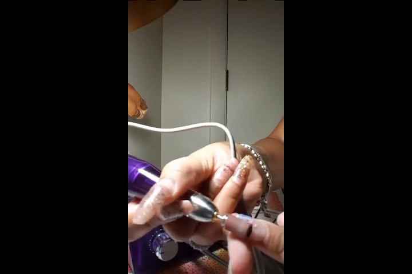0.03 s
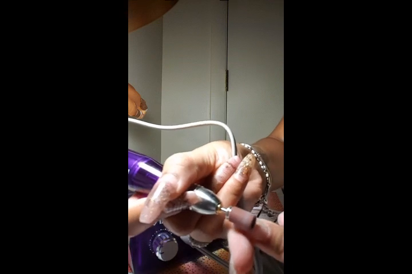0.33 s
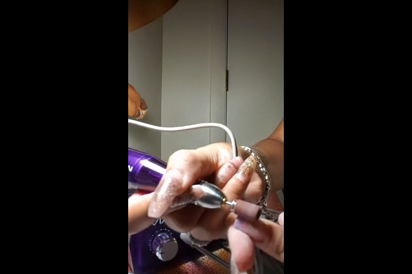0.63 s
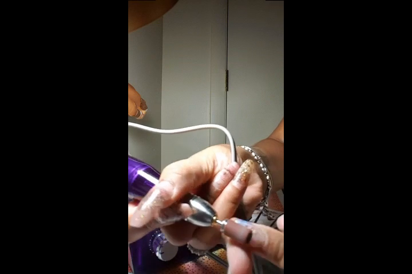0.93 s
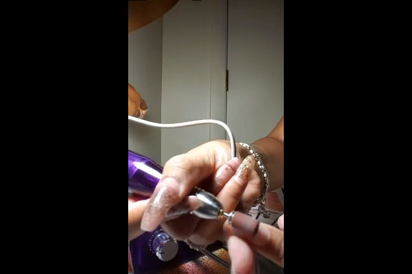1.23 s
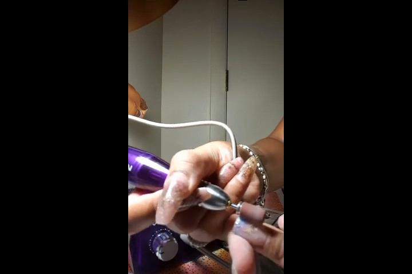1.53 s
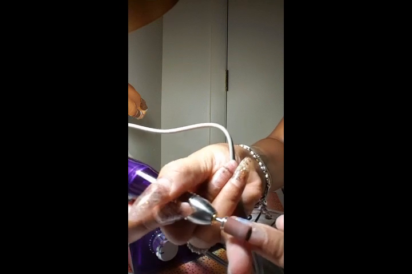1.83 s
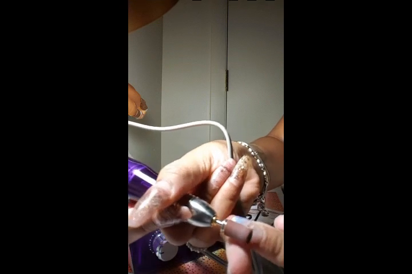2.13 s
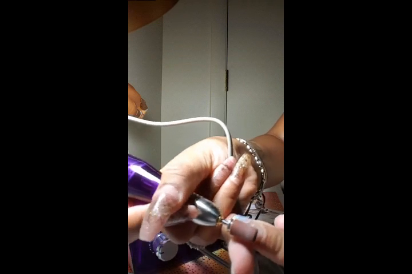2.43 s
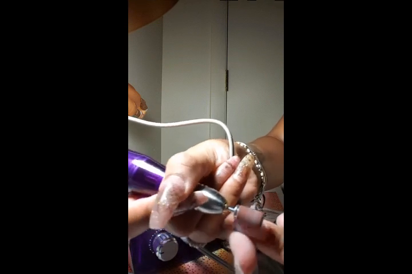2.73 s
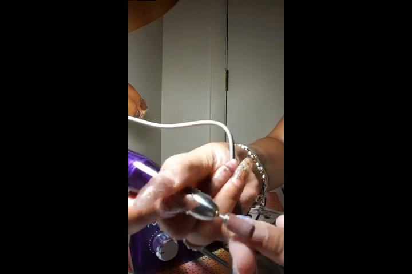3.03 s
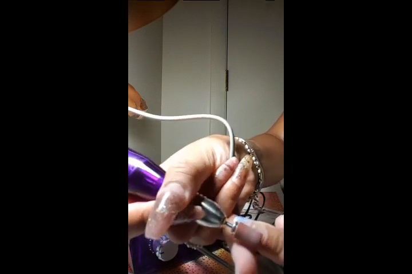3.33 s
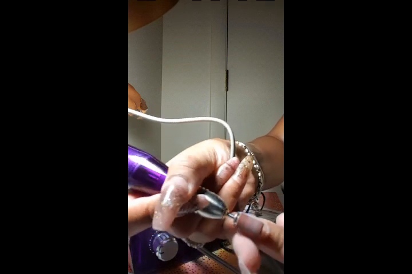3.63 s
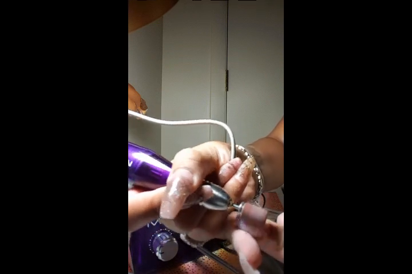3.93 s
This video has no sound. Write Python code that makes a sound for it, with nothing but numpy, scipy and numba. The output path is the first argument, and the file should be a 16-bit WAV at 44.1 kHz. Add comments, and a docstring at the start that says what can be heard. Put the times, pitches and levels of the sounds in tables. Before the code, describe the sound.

Four gritty strokes of an electric nail drill on a nail, its motor whining between them.

```python
"""An electric nail file whines close by in a small room, at about 100 turns a second, over a low hum.
Its motor brushes tick and its bearing rustles. At 0.2 s the bit meets a fingernail, and the same grit
strikes the nail on every turn: a light touch rattles on the bit's high spot, a firm one rasps all round
and slows the motor. The bit lifts and the motor whines freely again. More strokes follow at 1.1 s and
2.5 s, and a fourth from 3.4 s drags the motor lowest and is still grinding at the end."""
import sys
import numpy as np
from scipy import signal
from scipy.fft import rfft, irfft, next_fast_len
from scipy.io import wavfile
from scipy.ndimage import uniform_filter1d, map_coordinates
from numba import njit

SR = 44100
rng = np.random.default_rng(int(sys.argv[2]) if len(sys.argv) > 2 else 0)


def pcm_store(signal):
    """Save signal as 16-bit PCM."""
    levels = np.round(np.clip(np.atleast_2d(signal), -1, 1) * 32767)
    wavfile.write(sys.argv[1], SR, levels.astype(np.int16).T)


N = 176400
TIME = np.arange(N) / SR

# The shaft slowing under load. Each row: time in seconds, turns per second.
SHAFT_SPEED = [(0.0, 100.2), (0.2, 100.2), (0.39, 94.0), (0.61, 90.2), (0.66, 90.4), (0.72, 95.4),
               (0.76, 96.8), (0.82, 95.0), (0.85, 95.0), (0.92, 100.2), (1.11, 100.3), (1.32, 95.2),
               (1.5, 92.7), (1.55, 93.6), (1.6, 97.9), (1.67, 99.7), (1.77, 100.3), (2.51, 100.5),
               (2.6, 97.5), (2.68, 96.2), (2.78, 96.5), (2.93, 92.4), (2.99, 94.6), (3.06, 99.6),
               (3.1, 100.3), (3.33, 100.4), (3.45, 99.4), (3.56, 93.8), (3.69, 91.6), (3.79, 87.4),
               (3.87, 87.1), (4.0, 89.5)]
# The whine's partials. Each row: multiple of the shaft speed, relative level in dB.
WHINE_PARTIALS = [(9, -61.5), (10, -68.5), (11, -78.5), (12, -59), (13, -62.5), (14, -69), (15, -68),
                  (17, -63), (18, -66.5), (25, -98), (26, -72), (27, -64.5), (29, -74.5), (39, -71),
                  (43, -70), (57, -67), (113, -91), (117, -76), (128, -82)]
# Tone colours. Each row: frequency in Hz, relative level in dB.
BRUSH_EQ = [(300, -14), (600, -5.5), (1200, -21), (1800, -10), (2100, -8), (2700, 3.5), (3300, 0),
            (3700, -22), (4300, -1.5), (5100, -17), (5750, -3.5), (6400, -9), (7800, -14), (9200, -6),
            (10400, -12), (11600, -3), (12700, -1), (14500, -13.5)]  # bright ticks of the motor brushes
BEARING_EQ = [(1500, -30), (2300, -8), (2500, -4), (2750, 25), (3100, 4), (3800, -29), (4350, 9),
              (4900, -25), (8000, -58)]  # narrow rustle of the handpiece
HUM_EQ = [(20, -3), (32, -53), (44, -42), (52, -9), (58, 12), (66, -6), (80, -31), (95, -4), (110, -3.5),
          (130, -8.5), (170, -9.5), (240, -9), (320, -19), (500, -22.5), (800, -20.5), (1500, -68)]  # low room hum
HISS_EQ = [(200, -2), (600, -9), (1200, 3.5), (2500, 4), (6000, -4.5), (14000, -6)]  # faint background hiss
RASP_EQ = [(150, -58.5), (300, -30), (380, -20.5), (490, -22.5), (630, -10), (780, -5.5), (1100, -3),
           (1450, 0.5), (1750, 1.5), (2250, 1), (2800, 2), (3150, -9), (3550, -9), (3900, -5.5), (4130, -9),
           (4380, 3), (4750, -12), (5350, -4.5), (5900, -14), (6500, -11), (7400, -24), (8600, -14.5),
           (9800, -29.5), (10800, -34), (12000, -24.5), (14500, -26.5)]  # grit on the nail
POWDER_EQ = [(2000, -56), (6000, -2), (7300, -1.5), (8600, 2), (9700, -2.5), (10700, -6), (12000, -3.5),
             (13200, -13), (14500, -5.5)]  # airy hiss of nail powder
KNOCK_EQ = [(100, -3), (250, -15.5), (380, -0.5), (470, -2), (620, 1), (800, -7.5), (1100, -31),
            (2000, -48)]  # dull knock of a light touch
# Panning between the microphone ports. Each row: frequency in Hz, left minus right in dB.
MOTOR_PAN = [(900, 2.5), (1800, -3), (2700, -9.5), (3100, 16), (4000, -17.5), (5700, -21), (7000, 33),
             (10000, -8.5), (11700, 20), (14000, -9)]
RASP_PAN = [(60, -1.5), (80, -1.5), (110, -0.5), (140, 0.0), (190, -1.5), (260, -8), (340, -16),
            (460, -14.5), (610, -2.5), (820, -4.5), (1100, -19), (1470, 0), (1960, 3), (2620, -4.5),
            (3510, -1), (4690, -2.5), (6270, -0.5), (8390, 2.0), (11200, 4), (15000, 4)]
# The rasp's stereo phase. Each row: frequency in Hz, lead of the left port in radians.
RASP_LEFT_LEAD = [(0, -11), (950, 1.5), (1290, -2.5), (1980, -4.5), (2500, -4), (2840, -4.0), (3190, -2),
                  (3450, -2.5), (3700, -1.84), (4130, -1), (4480, -2.2), (4740, -1), (5080, -0.4),
                  (5510, 2.5), (6120, 0.5), (7060, 5.5), (7490, 2.2), (7750, -1), (8270, 5), (8530, 0.6),
                  (9040, 5.5), (9300, -5.5), (9910, 5.5), (10800, 5.5), (11500, 14), (11900, 9.3),
                  (14600, 22.5), (15400, -3)]
# One envelope per stroke on the nail. Each row: time in seconds, overall level in dB, then trims in dB
# for the treble, the low ring and the powder hiss.
STROKE_ENVELOPES = [
    [(0.19, -65, -4, -4, -11), (0.196, -45, -4.5, -12, -15), (0.274, -43, -2.5, -9.5, -6),
     (0.41, -35.5, -2.5, -9.5, -10.5), (0.614, -37, -2.5, -10.5, -10.5), (0.642, -34, -2, -13.5, -12.5),
     (0.76, -36, -4.5, -20, -9), (0.836, -34.5, -2.5, -19, -9), (0.878, -41.5, 0.5, -13.5, -3),
     (0.914, -52, -12, -22, -4), (0.93, -63, 4, -11, -6)],
    [(1.13, -67, -5, -11, -9), (1.136, -43.5, -3, -12, -12), (1.164, -41, -4.5, -14.5, -7),
     (1.312, -38, -2, -7, -14), (1.362, -34, -2, -9.5, -14.5), (1.556, -34.5, -4.5, -14, -14.5),
     (1.686, -45, -3, -15, -18), (1.72, -60, 2, -19, -15)],
    [(2.5, -57, 12, -8, -5), (2.506, -51.5, -1, -14, -13), (2.532, -40, -4.5, -13, -7),
     (2.614, -42.5, -2, -6, -11), (2.62, -37.5, -2, -9, -19), (2.706, -39, -3.5, -8, -15.5),
     (2.886, -33.5, -4.5, -11.5, -19), (2.916, -35, -7.5, -10, -11.5), (2.968, -34.5, -3.5, -10.5, -20),
     (3.028, -37, -8, -12, -21), (3.056, -57, 0, -21, -6), (3.07, -54, -4, -11, -6)],
    [(3.41, -77, 2, -3, -1), (3.42, -44.5, -2.5, -11.5, -9), (3.514, -37, -5.5, -8.5, -17),
     (3.574, -36.5, -7.5, -6.5, -16), (3.618, -33.5, -3.5, -7.5, -20), (3.752, -34, -7.5, -7, -18.5),
     (3.87, -30, -8.5, -12.5, -20), (3.984, -32.5, -7, -8, -17.5), (4.0, -30, -3, -11, -31)],
]
# How each stroke lands. Each row: time in seconds when the high spot first meets the nail, and its
# bite in dB over the far side of the bit under a firm touch.
STROKE_CONTACTS = [(.198, -4.5), (1.138, 4.5), (2.508, -0.5), (3.422, 3)]
# The nail's resonances. Each row: pitch at rest in Hz, fractional rise under full pressure,
# width in Hz, relative level in dB.
NAIL_MODES = [(740, .7, 220, -6), (2050, .22, 320, -8)]

FREE_HZ, FIRM_SAG_HZ = 100.4, 3.2  # unloaded shaft speed; the slowing that marks a firm touch
LOAD_FLUTTER, LOAD_FLUTTER_HZ = 0.0277, 29.79  # unsteady speed, as a share of the slowing
WHINE_DB, BRUSH_DB, BEARING_DB, HUM_DB, HISS_DB = -1.5, -55.5, -67, -57, -57.5
WHINE_WANDER_DB, BRUSH_WANDER_DB, MOTOR_WANDER_HZ = 2.2, 1.8, 6
WHINE_FADE_DB_PER_HZ = 14  # slowing damps the top partial this much, lower ones less
BEARING_FLUTTER_DB, BEARING_FLUTTER_HZ = 4, 23
GRIT_COUNT, GRIT_WANDER_DB, GRIT_WANDER_HZ = 80, 6, 10  # grains round the bit; how their bite drifts
GRIT_JITTER_S, GRIT_SCATTER_DB = 1.8e-5, 1.47  # chance from turn to turn
LIGHT_DEPTH_DB, CHATTER = 28, 2.17  # light touch: dip between high spots; extra jitter, times the usual
GRIP_SHAKE_DB, GRIP_SHAKE_HZ = 1.23, 24
LOW_DB, MID_DB, TREBLE_DB, POWDER_DB, KNOCK_DB = 3, -3, -1, -1.5, -11
WALLS_T60_S, WALLS_DB = .11, -9
TOP_HZ = 14650


def amp(db):
    """Decibels to gain."""
    return 10 ** (np.asarray(db) / 20)


def unit(x):
    """Scale to rms 1."""
    return x / np.sqrt(np.mean(x ** 2) + 1e-20)


def steady(x):
    """Ride the gain to hold rms 1 over every few turns."""
    power = np.mean(np.atleast_2d(x), 0) ** 2
    power = uniform_filter1d(uniform_filter1d(power, size=1400), size=1400)
    return x / np.sqrt(np.abs(power) + 1e-20)


def wobble(rate):
    """A smooth random curve, rate knots a second."""
    return map_coordinates(rng.standard_normal(400), [TIME * rate], mode='mirror')


def along(points, hz):
    """Read (Hz, value) points on a log frequency axis."""
    knots_hz, values = np.transpose(points)
    return np.interp(np.log(hz + 1), np.log(knots_hz + 1), values)


def curves(rows):
    """An automation curve for each column after the time."""
    times, *columns = np.transpose(rows)
    return [np.interp(TIME, times, column) for column in columns]


def filtered(x, response):
    """Apply a frequency response."""
    size = next_fast_len(N + SR // 2)
    return irfft(rfft(x, size) * response(np.fft.rfftfreq(size, 1 / SR)), size)[..., :N]


def coloured(x, eq):
    """Minimum-phase EQ through (Hz, dB) points."""
    cepstrum = irfft(np.log(amp(along(eq, np.fft.rfftfreq(4096, 1 / SR)))))
    cepstrum[1:2048] *= 2
    cepstrum[2049:] = 0
    impulse = irfft(np.exp(rfft(cepstrum)))
    return signal.fftconvolve(np.atleast_2d(x), impulse[None], axes=1)[:, :N]


def whitened(x):
    """Even out the long-term colour, keeping the movement within each turn."""
    bins_hz, power = signal.welch(x, SR, nperseg=256)
    return filtered(x, lambda hz: np.interp(hz, bins_hz, power + 1e-4 * power.mean()) ** -.5)


def panned(x, pan, left_lead=((100, 0), (15000, 0))):
    """Share each frequency between the left and right microphone ports."""
    def response(hz):
        ratio = amp(along(pan, hz)) * np.exp(1j * along(left_lead, hz))
        return np.array([ratio, np.ones(len(hz))]) / np.sqrt((1 + np.abs(ratio) ** 2) / 2)
    return filtered(x, response)


def strikes(turns, places, sizes, jitter_s):
    """Clicks at given shaft positions, placed between samples by a windowed sinc."""
    at = np.interp(places, turns, np.arange(N), left=-SR, right=-SR)
    at += jitter_s * SR * rng.standard_normal(places.shape)
    inside = (at > 8) & (at < N - 9)
    at, sizes = at[inside][:, None], sizes[inside][:, None]
    taps = at.astype(int) + np.arange(-7, 9)
    kernel = np.sinc(taps - at) * np.cos(np.pi * (taps - at) / 16) ** 2
    return np.bincount(taps.ravel(), (sizes * kernel).ravel(), N)


@njit
def resonate(x, pole):
    """A resonance whose pole moves from sample to sample."""
    out, z = np.zeros(len(x)), 0j
    for i in range(len(x)):
        z = z * pole[i] + x[i]
        out[i] = z.real
    return out


def motor_whine(sag_hz, turns):
    """Clean harmonics of the shaft drift in level; load dulls the high ones most."""
    whine = np.zeros((2, N))
    for order, db in WHINE_PARTIALS:
        height = order / WHINE_PARTIALS[-1][0]
        drift_db = WHINE_WANDER_DB * np.sqrt(height) * wobble(MOTOR_WANDER_HZ)
        fade_db = WHINE_FADE_DB_PER_HZ * height * sag_hz
        phase = 2 * np.pi * (order * turns + rng.random()) + rng.normal(0, 0.72, (2, 1))
        whine += amp(db + drift_db - fade_db) * np.sqrt(2) * np.sin(phase)
    return amp(WHINE_DB) * whine


def motor_brushes(turns):
    """The brushes repeat the same ticks on every turn, mostly different ones left and right."""
    places = np.arange(int(turns[-1]) + 2)[:, None] + rng.random(size=60)

    def ticks():
        sizes = rng.standard_normal(places.shape[1]) * amp(0.51 * rng.standard_normal(places.shape))
        train = strikes(turns, places, sizes, jitter_s=3.5e-6)
        return train * amp(BRUSH_WANDER_DB * wobble(MOTOR_WANDER_HZ))
    wide_ticks = 0.27 * ticks() + np.array([ticks(), ticks()])
    return amp(BRUSH_DB) * unit(coloured(wide_ticks, BRUSH_EQ))


def bearing():
    """A rustle from the handpiece that flutters almost regularly."""
    flutter = 1.3 * np.sin(2 * np.pi * BEARING_FLUTTER_HZ * TIME + 0.98 * wobble(6)) + .5 * wobble(7.6)
    wide_noise = rng.standard_normal(N) + 4.5 * rng.standard_normal((2, N))
    return amp(BEARING_DB + BEARING_FLUTTER_DB * flutter) * unit(coloured(wide_noise, BEARING_EQ))


def room_tone():
    """A low hum near the centre and a faint, wide hiss."""
    hum = unit(coloured(rng.standard_normal(N) + 0.41 * rng.standard_normal((2, N)), HUM_EQ))
    hiss = unit(coloured(rng.standard_normal((2, N)), HISS_EQ))
    return amp(HUM_DB) * hum + amp(HISS_DB) * hiss


def high_spot(turns, light):
    """The bit's high spot comes round once a turn: how it faces the nail (0 to 1), and the contact gain."""
    stroke = np.searchsorted([rows[-1][0] for rows in STROKE_ENVELOPES[:-1]], TIME)
    landing_s, firm_db = np.transpose(STROKE_CONTACTS)
    landing_turn = np.interp(landing_s, TIME, turns)
    facing = np.cos(np.pi * (turns - landing_turn[stroke])) ** 2
    depth_db = (1 - light) * firm_db[stroke] + light * LIGHT_DEPTH_DB
    return facing, amp(depth_db * facing)


def grit(turns, light):
    """The same grains strike every turn, their bite drifting as the bit travels; a light touch chatters."""
    turn = np.arange(int(turns[-1]) + 2)
    places = turn[:, None] + rng.random(GRIT_COUNT)
    travel = np.meshgrid(turn * GRIT_WANDER_HZ / FREE_HZ, np.arange(GRIT_COUNT), indexing='ij')
    drift = map_coordinates(rng.standard_normal((120, GRIT_COUNT)), travel, mode='mirror')
    polarity = rng.choice([-1, 1], GRIT_COUNT)
    sizes = polarity * amp(GRIT_WANDER_DB * drift + GRIT_SCATTER_DB * rng.standard_normal(places.shape))
    jitter_s = GRIT_JITTER_S * (1 + CHATTER * np.interp(places, turns, light) ** 2)
    return strikes(turns, places, sizes, jitter_s)


def nail_rasp(bite, pressure):
    """Grit rings the nail; the pressing high spot stiffens it and bends the ring upward once a turn."""
    ring = np.zeros(N)
    for rest_hz, rise, width_hz, db in NAIL_MODES:
        hz = rest_hz * (1 + rise * pressure)
        pole = np.exp((2j * np.pi * hz - np.pi * width_hz) / SR)
        ring += amp(db) * unit(resonate(bite, pole))
    return panned(coloured(whitened(ring + bite), RASP_EQ), RASP_PAN, RASP_LEFT_LEAD)


def walls(x):
    """Add the small room's short tail, different at each port."""
    t = np.arange(SR // 3) / SR
    tail = rng.standard_normal((2, len(t))) * amp(-60 * t / WALLS_T60_S) * (t > .002)
    return x + amp(WALLS_DB) * signal.fftconvolve(x, tail / np.linalg.norm(tail[0]), axes=1)[:, :N]


def grip_shake(x):
    """Level a layer, then let it tremble with the unsteady bite."""
    return steady(x) * amp(GRIP_SHAKE_DB * wobble(GRIP_SHAKE_HZ))


def rasp_bands(rasp):
    """Split the rasp into low ring, mids and treble, each trembling on its own."""
    def below(hz, edge_hz):
        return 1 / (1 + (hz / edge_hz) ** 12)
    low = filtered(rasp, lambda hz: below(hz, 1210))
    mid = filtered(rasp, lambda hz: below(hz, 3480) - below(hz, 1312))
    treble = filtered(rasp, lambda hz: 1 - below(hz, 3020))
    return grip_shake(low), grip_shake(mid), grip_shake(treble)


def powder_hiss(contact):
    """Specks of nail powder hiss, pulsing more softly than the contact does."""
    specks = rng.standard_normal((2, N)) * amp(7.2 * rng.standard_normal(N))
    return grip_shake(panned(coloured(contact ** .6 * specks, POWDER_EQ), RASP_PAN))


def bit_knock(bite, contact, light):
    """Under a light touch the high spot knocks dully on the nail."""
    thuds = bite + .5 * steady(contact * rng.standard_normal(N))
    return light * steady(panned(coloured(thuds, KNOCK_EQ), RASP_PAN))


def filing(sag_hz, turns):
    """Four strokes of rasp, powder and knock; pressure spreads the contact round the turn."""
    light = np.exp(-sag_hz / FIRM_SAG_HZ)  # 1 barely touching, toward 0 pressed hard
    facing, contact = high_spot(turns, light)
    bite = steady(grit(turns, light) * contact)
    low, mid, treble = rasp_bands(walls(nail_rasp(bite, pressure=(1 - light) * facing)))
    powder = powder_hiss(contact)
    knock = bit_knock(bite, contact, light)
    out = np.zeros((2, N))
    for envelope in STROKE_ENVELOPES:
        level_db, treble_db, low_db, powder_db = curves(envelope)
        touching = (TIME >= envelope[0][0]) & (TIME <= envelope[-1][0])
        rasp = amp(low_db + LOW_DB) * low + amp(MID_DB) * mid + amp(treble_db + TREBLE_DB) * treble
        layers = rasp + amp(powder_db + POWDER_DB) * powder + amp(KNOCK_DB) * knock
        out += touching * amp(level_db) * layers
    return out


def scene():
    """One shaft drives both the whine and the rasp; load makes it unsteady."""
    speed, = curves(SHAFT_SPEED)
    sag_hz = np.maximum(FREE_HZ - speed, 0)
    flutter_hz = LOAD_FLUTTER * (FREE_HZ - speed) * wobble(LOAD_FLUTTER_HZ)
    turns = np.cumsum(speed + flutter_hz) / SR
    strokes = filing(sag_hz, turns)
    motor = panned(motor_whine(sag_hz, turns) + motor_brushes(turns), MOTOR_PAN)
    return motor + bearing() + room_tone() + strokes


def record(dry):
    """A brick-wall low-pass takes off the very top."""
    return filtered(dry, lambda hz: hz < TOP_HZ)


dry = scene()
out = record(dry)
pcm_store(out)
```